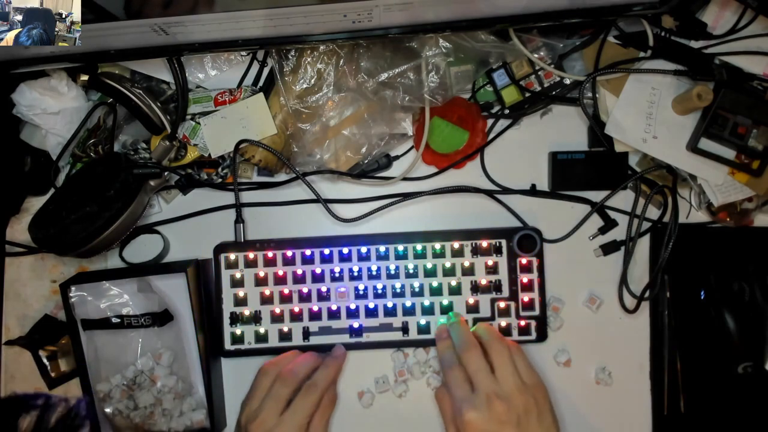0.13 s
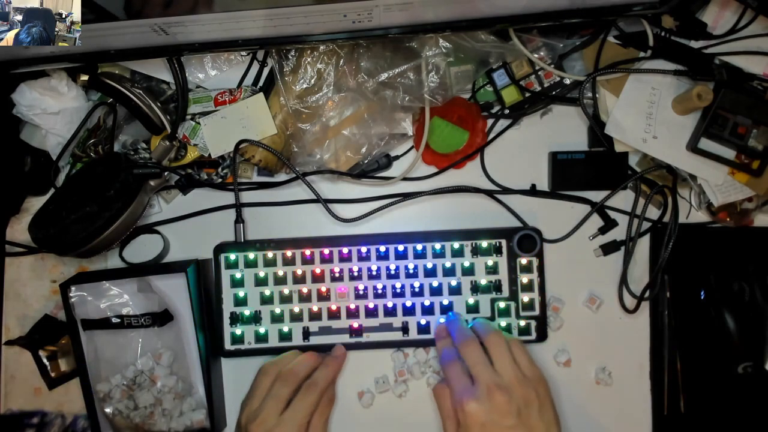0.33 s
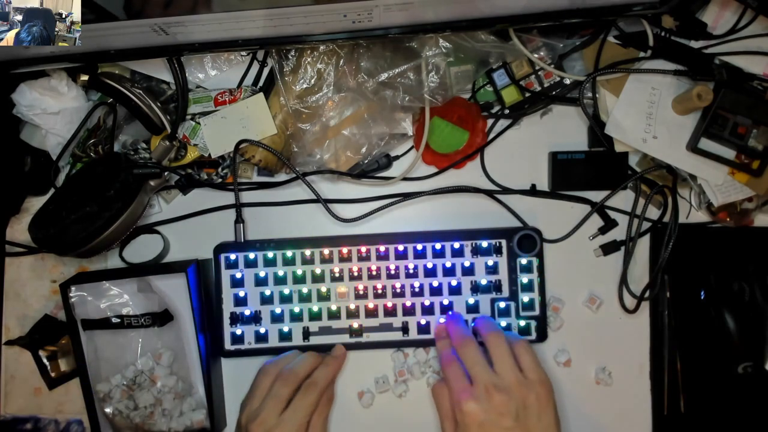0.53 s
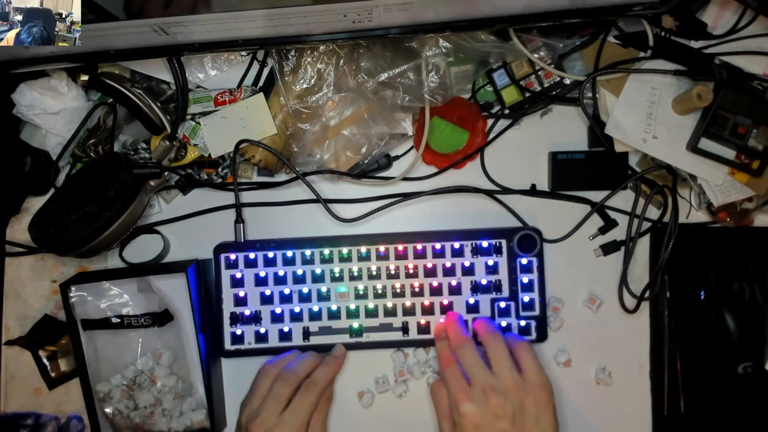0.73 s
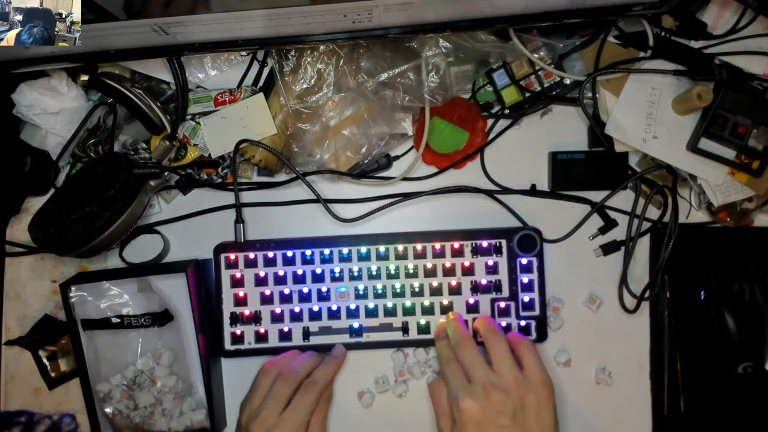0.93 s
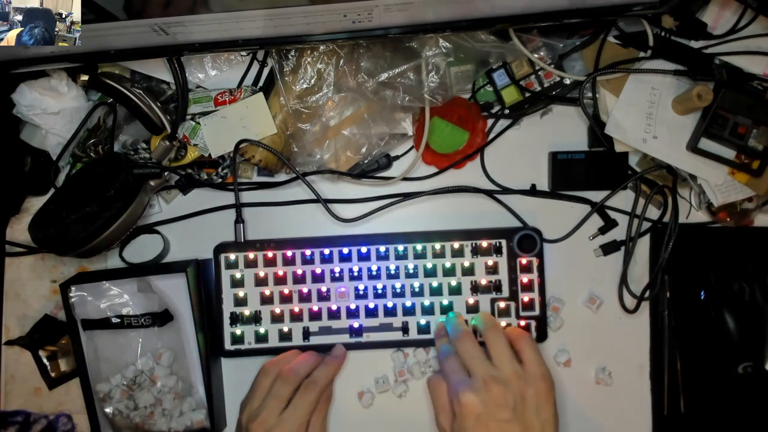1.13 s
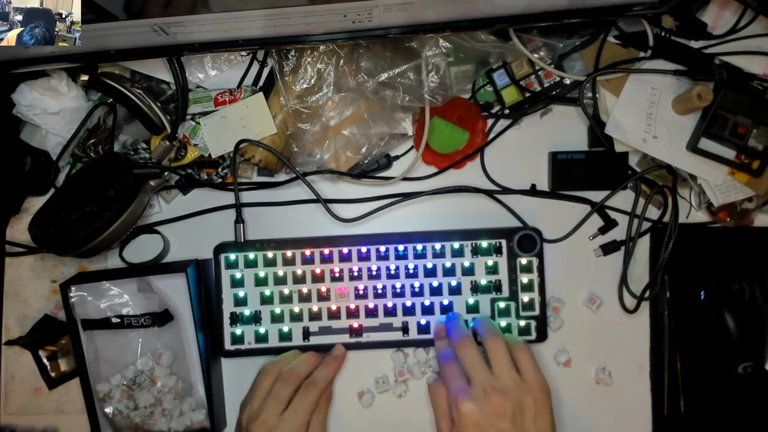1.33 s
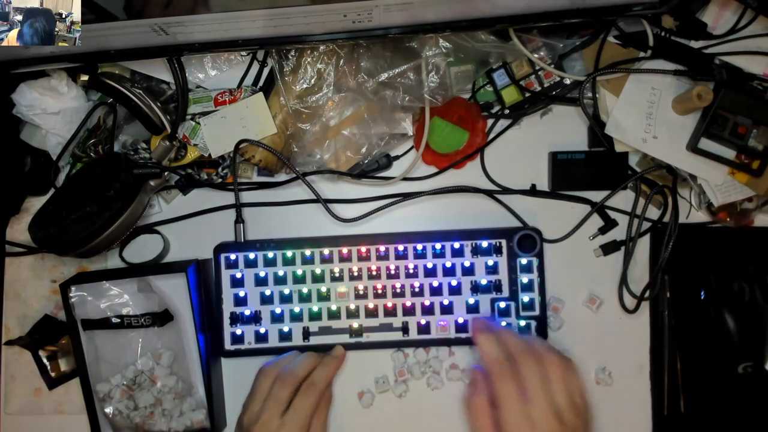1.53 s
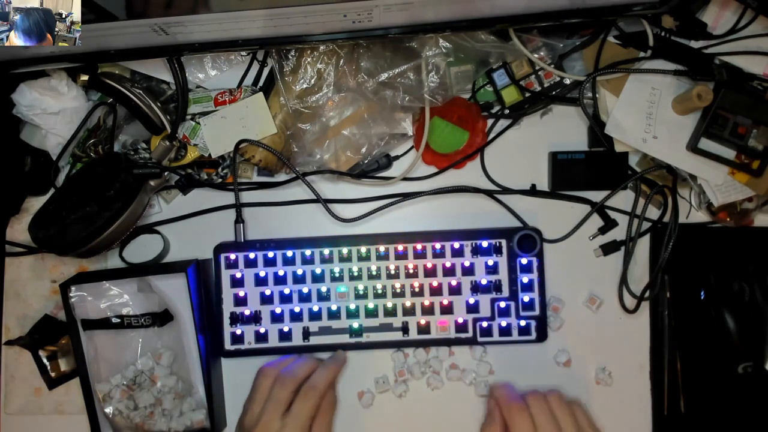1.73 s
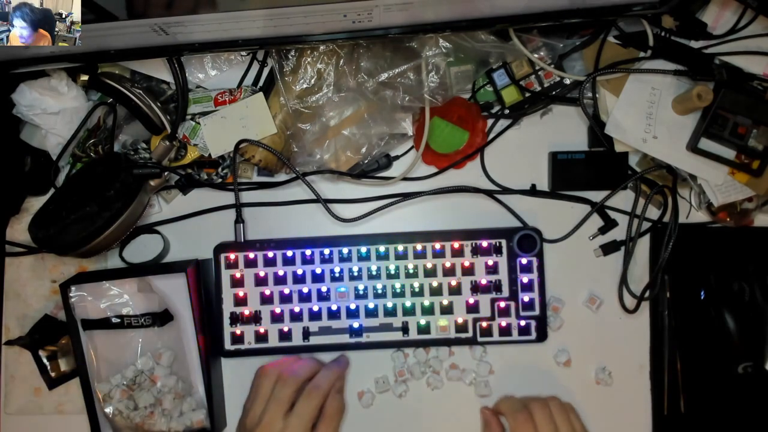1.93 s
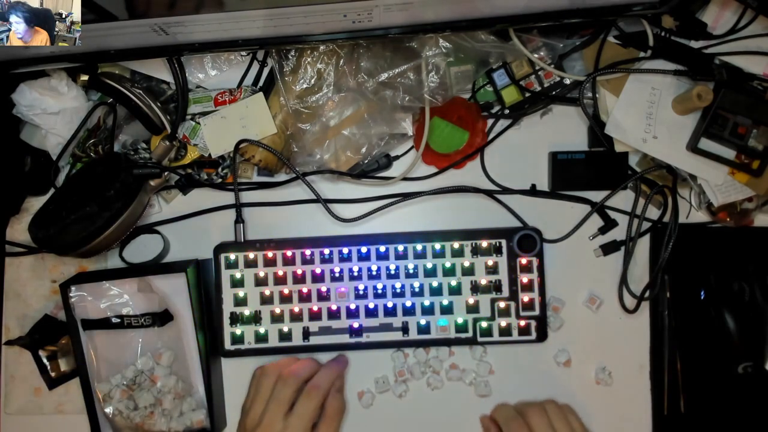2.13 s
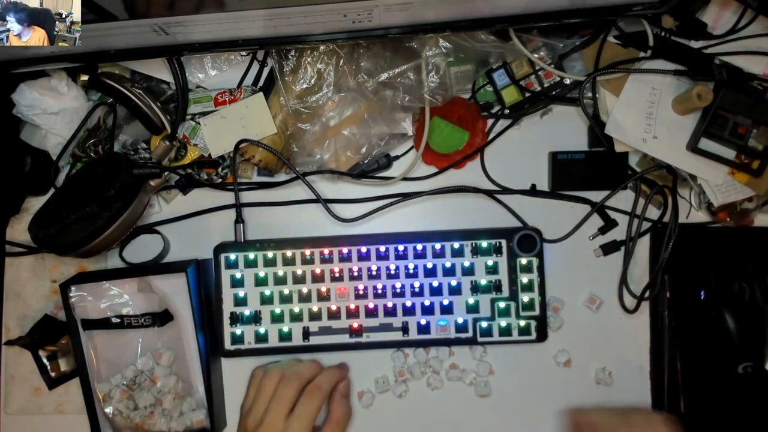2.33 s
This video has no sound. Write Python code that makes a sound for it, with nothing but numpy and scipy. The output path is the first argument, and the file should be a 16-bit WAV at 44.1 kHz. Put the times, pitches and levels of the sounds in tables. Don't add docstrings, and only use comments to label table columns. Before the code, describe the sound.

One sharp plastic keyboard clack, preceded by a soft knock and followed by a faint click

```python
import sys
import numpy as np
from scipy import signal
from scipy.io import wavfile
from scipy.ndimage import uniform_filter1d

SR = 44100
rng = np.random.default_rng(int(sys.argv[2]) if len(sys.argv) > 2 else 0)


def voltage_ratio(decibels):
    exponent = np.asarray(decibels, float) / 20
    return 10 ** exponent


def digitize_waveform(pressure):
    field = np.atleast_2d(pressure).T
    bounded = np.clip(field, -1, 1)
    quanta = np.round(bounded * 32767).astype(np.int16)
    wavfile.write(sys.argv[1], SR, quanta)


N = 108971


def evened(x):
    return x / np.sqrt(np.mean(x ** 2) + 1e-20)


def peak_evened(x):
    return x / np.sqrt(uniform_filter1d(x ** 2, 130).max())


def read(points, hz):
    f, value = np.transpose(points)
    return np.interp(np.log(hz + 1), np.log(f + 1), value)


def add(mix, start_s, sound):
    part = mix[round(start_s * SR):][:len(sound)]
    part += sound[:len(part)]


def resonate(x, hz, width):
    r = np.exp(-np.pi * width / SR)
    return 2 * signal.lfilter([1 - r], [1, -r * np.exp(2j * np.pi * hz / SR)], x).real


def swell(t, rise_s, t60):
    hold_s = 0.97 * rise_s
    return np.minimum(t / rise_s, 1) ** 1.8 * voltage_ratio(-60 * np.maximum(t - hold_s, 0) / t60)


# pitch in Hz, level in dB, time to die by 60 dB in seconds.
CASE_MODES = [(412, -20, 0.079), (660, -22, 0.0544), (1020, -17, .04), (1320, -4.5, .03), (1600, -9, .03),
              (1900, -4.5, .03), (2250, -1, .02), (2620, 1, .015), (2795, -3.5, .02), (4040, -7.5, 0.012),
              (4486, -9.5, 0.022), (6100, -22.5, 0.017), (8060, -11, 0.014), (5000, -13.5, .015)]


def clack(db, tilt_db, bright_hz, rise_s, crack_db, crack_hz, room_db, focus_db):
    t = np.arange(SR // 3) / SR

    def colour_db(hz, focus_share):
        tilt = tilt_db * np.log2(hz / 2500)
        return tilt + focus_share * focus_db * np.log2(hz / bright_hz) ** 2

    ring = np.zeros(len(t))
    for hz, mode_db, t60 in CASE_MODES:
        mode_rise_s = rise_s * max(bright_hz / hz, 1) ** 0.75
        wave = np.sin(2 * np.pi * (hz * t + rng.random()))
        ring += voltage_ratio(mode_db + colour_db(hz, 0.77)) * swell(t, mode_rise_s, t60) * wave
    crack = rng.standard_normal(len(t)) * rng.random(len(t))
    for _ in range(2):
        crack = evened(resonate(crack, crack_hz, 1.04 * crack_hz))
    crack = voltage_ratio(crack_db) * crack * swell(t, rise_s, 0.018)
    return voltage_ratio(db) * (peak_evened(ring) + crack + voltage_ratio(room_db) * room(t, colour_db))


# pitch in Hz, time to die by 60 dB in seconds.
ROOM_T60 = [(300, .3), (1000, 0.12), (2500, 0.17), (6000, 0.1568), (14000, 0.11)]
# pitch in Hz, level in dB.
ROOM_COLOUR = [(250, -18), (600, -5), (1300, 3), (2300, -2.5), (3500, -13), (8000, -21.5), (15000, -24.5)]


def room(t, colour_db):
    hz, frame_s, z = signal.stft(rng.standard_normal(len(t)), SR, nperseg=128)
    level_db = read(ROOM_COLOUR, hz) + colour_db(hz + 100, 0.13)
    fall_db = 60 * frame_s / read(ROOM_T60, hz)[:, None]
    tail = signal.istft(z * voltage_ratio(level_db[:, None] - fall_db), SR, nperseg=128)[1][:len(t)]
    start_s = 0.0015
    return tail / np.sqrt(np.mean(tail[:400] ** 2)) * np.minimum(t / start_s, 1) ** 2


# pitch in Hz, level in dB,
# time to die by 60 dB in seconds, direction of the first push (1 or -1).
DESK_MODES = [(28.62, -6.5, 0.9, 1), (51.31, -17, 2.2, 1), (52.3, -19, 0.32, -1), (66.5, -2.5, .2, 1),
              (84.6, 3, 0.19, 1), (132, -13, .25, 1), (205, -20, .6, 1), (240, -4, 0.15, 1),
              (266, -16, 0.49, 1), (328, -21, .5, 1), (390, -13.5, .12, 1)]
# pitches in Hz, then levels in dB, then times to die by 60 dB in seconds.
PAIR_HZ = [99.2, 102.2]
PAIR_DB = [-26.5, -23.5]
PAIR_T60 = [3, 3.4]


def desk(db):
    t = np.arange(int(1.4 * SR)) / SR
    rise_turns = 0.33
    ring = np.zeros(len(t))
    for hz, mode_db, t60, push in DESK_MODES:
        wave = np.sin(2 * np.pi * hz * t) * (1 - np.exp(-t * hz / rise_turns))
        ring += np.sign(push) * voltage_ratio(mode_db - 60 * t / t60) * wave
    low, high = [voltage_ratio(pair_db - 60 * t / t60) * np.sin(2 * np.pi * hz * t)
                 for hz, pair_db, t60 in zip(PAIR_HZ, PAIR_DB, PAIR_T60)]
    return voltage_ratio(db) * (ring + low - high)


# start in seconds, clack level in dB, tilt in dB per octave,
# brightest pitch in Hz, desk level in dB.
PRESSES = [
    (1.0772, -42.5, 3, 2350, -76),
    (1.1291, -31.5, -7.5, 1110, -37),
    (1.4229, -7, 2.5, 2598, -21),
    (1.7945, -45.5, 0.5, 2720, -78),
    (1.799, -40.5, 7, 2250, -58.5),
    (2.2136, -52, -7.5, 1060, -49.5),
]
# rise in seconds, crack level in dB, crack pitch in Hz,
# room level in dB, focus around the brightest pitch in dB per octave squared.
TOUCHES = [(.0012, -14, 4360, -21.5, -10), (.003, -18.5, 8900, -12.5, -6), (.0018, -8, 5000, -16.5, -2.5),
           (.002, 1, 3800, -20.5, -15), (.002, -11, 5500, -14, -32.5), (.002, -1.5, 7870, -7.5, -7.5)]


def press_switch(mix):
    desk_lag_s = 0.0086
    for (s, db, tilt_db, bright_hz, desk_db), touch in zip(PRESSES, TOUCHES):
        add(mix, s, clack(db, tilt_db, bright_hz, *touch))
        add(mix, s + desk_lag_s, desk(desk_db))


def contacts(spread_s, count=400):
    t = np.arange(count) / SR
    rise_s = 0.00053
    hits = rng.standard_normal(count) * rng.random(count) ** 3
    return hits * np.minimum(t / rise_s, 1) ** 2 * voltage_ratio(-12 * (t / spread_s) ** 2)


def tick(db, hz, spread_s):
    out = np.pad(contacts(spread_s), (0, 600))
    for _ in range(2):
        out = resonate(out, hz, 0.6 * hz)
    return voltage_ratio(db) * peak_evened(out)


# start in seconds, level in dB, middle pitch in Hz, spread in seconds.
TICKS = [(.040, -60, 2230, 0.01), (.080, -59.5, 2140, 0.0031), (0.094, -60, 2240, 0.0079),
         (0.176, -75, 2260, 0.0039), (0.221, -72, 2230, 0.0039), (.274, -64.5, 4630, 0.0028),
         (0.296, -59, 7400, 0.0029), (0.364, -52.5, 1900, 0.008), (0.429, -60, 1900, 0.0071),
         (0.518, -69, 1660, .004), (0.626, -59.5, 2060, 0.0085), (1.043, -65, 2050, 0.0039),
         (1.077, -49, 12900, .003), (1.785, -61.5, 2460, 0.006), (1.786, -64, 4800, .003),
         (1.985, -58.5, 836.5, 0.0094), (2.074, -63.5, 1500, .004), (2.200, -62, 1500, .003),
         (2.201, -71, 5000, 0.0014), (2.215, -59.5, 10800, 0.0092), (2.215, -53, 704, 0.0078),
         (2.224, -60, 5000, 0.0045), (2.2253, -65, 855, 0.0097), (2.261, -69, 7000, 0.0037),
         (2.466, -65.5, 1400, .004), (1.1298, -52, 4400, 0.0061), (1.4238, -26.5, 4330, 0.0085)]


def tap_fingertips(mix):
    for s, db, hz, spread_s in TICKS:
        add(mix, s, tick(db, hz, spread_s))


def palm(db, hz, t60):
    t = np.arange(SR // 4) / SR
    return voltage_ratio(db - 60 * t / t60) * np.sin(2 * np.pi * hz * t) * (1 - np.exp(-t * hz))


# start in seconds, level in dB, pitch in Hz, time to die by 60 dB in seconds.
PALMS = [
    (0.054, -50.5, 95, 0.2),
    (2.200, -44.5, 171, 0.18),
    (2.455, -55, 190, 0.079),
]


def bump_palms(mix):
    for s, db, hz, t60 in PALMS:
        add(mix, s, palm(db, hz, t60))


# pitch in Hz, width in Hz, level in dB.
RUB_BANDS = [(2400, 260, 0), (1550, 220, -7), (4750, 180, -11)]


def rub():
    t = np.arange(N) / SR
    unevenness = evened(uniform_filter1d(rng.standard_normal(N), 300))
    grains = rng.standard_normal(N) * voltage_ratio(2.0 * unevenness)
    tone = np.zeros(N)
    for hz, width, db in RUB_BANDS:
        tone += voltage_ratio(db) * evened(resonate(resonate(grains, hz, width), hz, 2 * width))
    end_s = 0.28
    return voltage_ratio(-72.5) * tone * np.clip((end_s - t) / 0.082, 0, 1) * np.clip(t / 0.014, 0, 1)


# pitch in Hz, level in dB per Hz.
AIR_COLOUR = [(8.8, -37), (15, 4.5), (45, -2.5), (70, -21.5), (247, -16.5), (330, -25.5), (442, -29.5),
              (646, -32.5), (16000, -45.5)]
# pitch in Hz, width in Hz, level in dB.
FANS = [(118.4, 8, -70), (152, 8, -78.5), (247.6, 6, -82), (452, 5, -82), (549, 5, -83.5),
        (1583, 10, -80.5)]


def air():
    frames, hz = N // 512 + 6, np.fft.rfftfreq(2048, 1 / SR)
    a, b = rng.standard_normal((2, frames, 1025))
    z = (a + 1j * b).T * voltage_ratio(read(AIR_COLOUR, hz))[:, None]
    out = voltage_ratio(-56) * evened(signal.istft(z, nperseg=2048, noverlap=1536)[1][:N])
    for fan_hz, width, db in FANS:
        out = out + voltage_ratio(db) * evened(resonate(rng.standard_normal(N), fan_hz, width))
    return out


def scene():
    mix = rub() + air()
    press_switch(mix)
    tap_fingertips(mix)
    bump_palms(mix)
    return mix[None]


def top_cut(x):
    return signal.sosfilt(signal.butter(12, 16860, fs=SR, output="sos"), x)


# start in seconds, end in seconds,
# lowest pitch affected in Hz, pitch in Hz below which more bands are spared.
THINNED = [(.559, .572, 900, 2200), (.644, .656, 2000, 0), (.772, .787, 1200, 2200),
           (.836, .868, 1200, 2400), (1.178, 1.190, 3200, 0), (1.502, 1.552, 3000, 8800)]


def record(dry):
    limit = 0.9
    soft = limit * np.tanh(dry / limit)
    low_pass = signal.firwin(255, 15900, window=("kaiser", 5), fs=SR)
    cut = signal.oaconvolve(soft, low_pass[None], "same")
    hz, t, z = signal.stft(cut, SR, nperseg=256)
    keep = np.ones(z.shape[1:])
    for start, end, above_hz, spared_hz in THINNED:
        spared_odds = np.where(hz < spared_hz, 0.65, 0.1)
        draws = np.repeat(rng.random(65), 2)[:len(hz)]
        lost = (hz > above_hz) & (draws > spared_odds)
        keep[np.ix_(lost, (t > start) & (t < end))] = voltage_ratio(-22)
    mix = signal.istft(z * keep, SR, nperseg=256)[1][:, :N]
    return top_cut(mix)


dry = scene()
out = record(dry)
digitize_waveform(out)
```